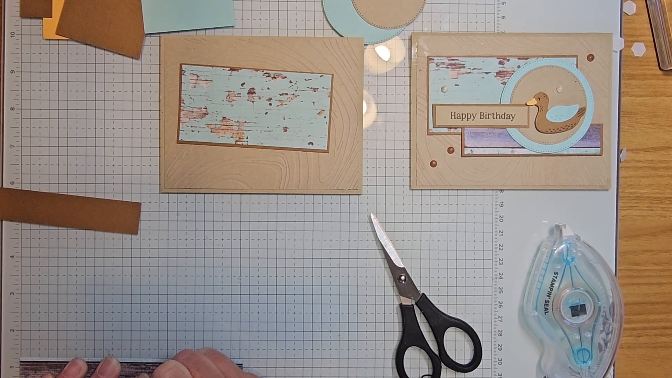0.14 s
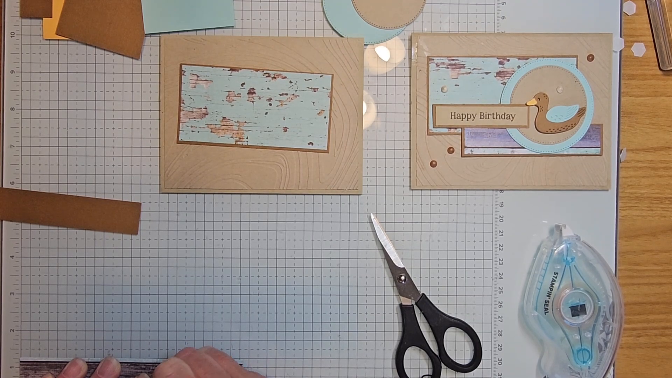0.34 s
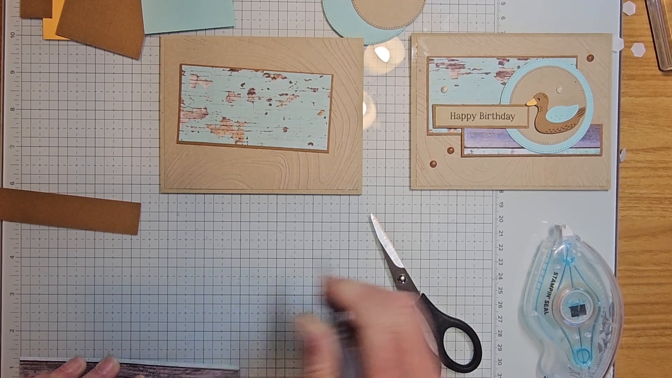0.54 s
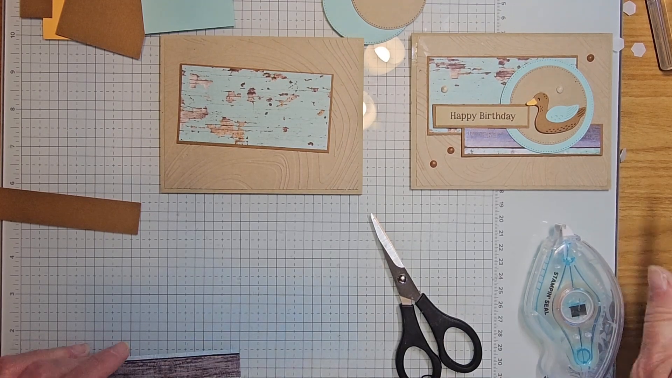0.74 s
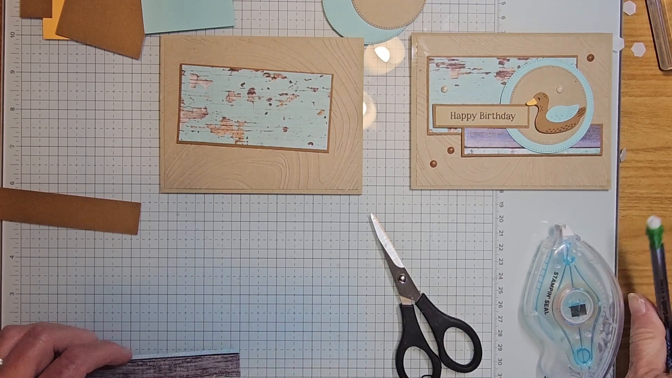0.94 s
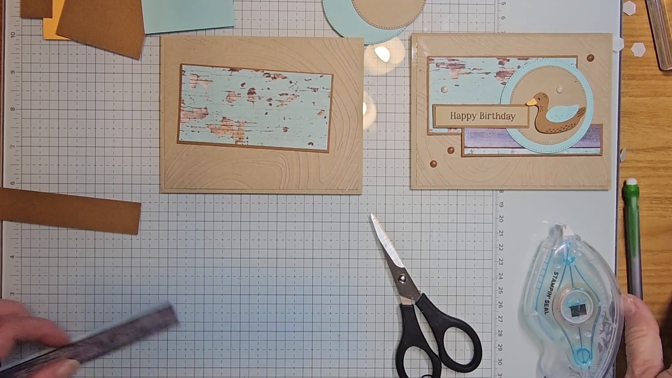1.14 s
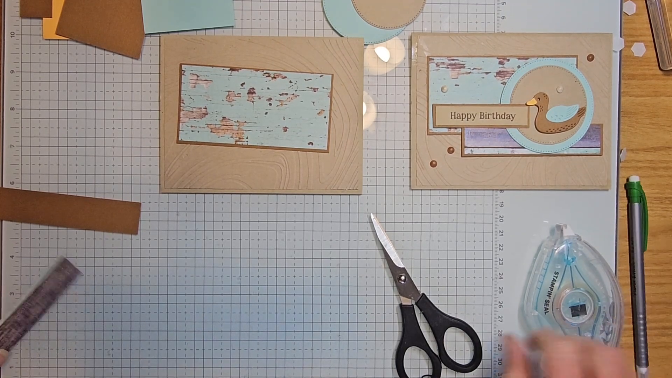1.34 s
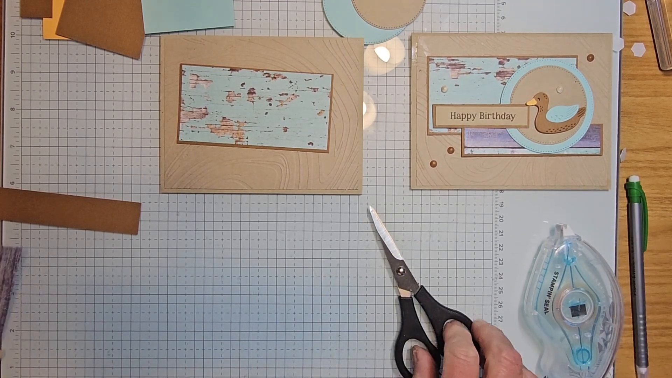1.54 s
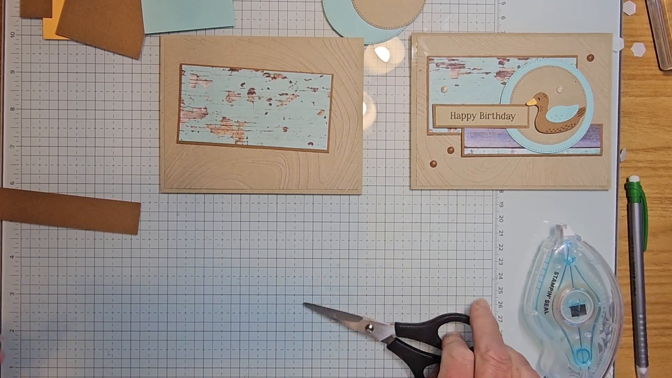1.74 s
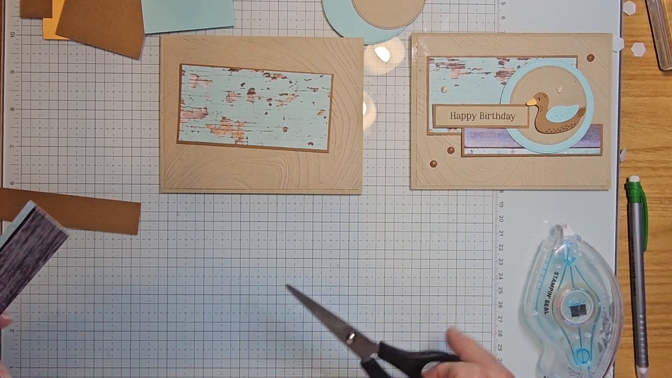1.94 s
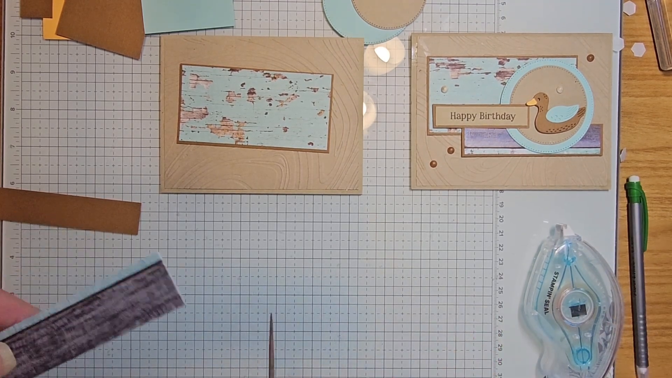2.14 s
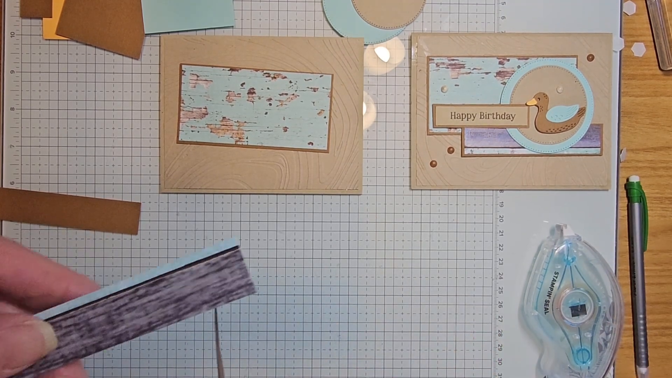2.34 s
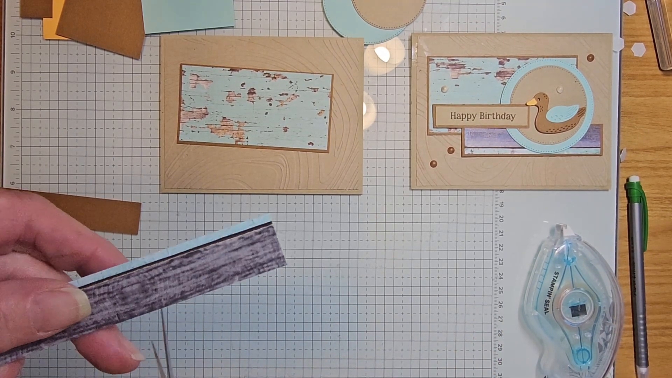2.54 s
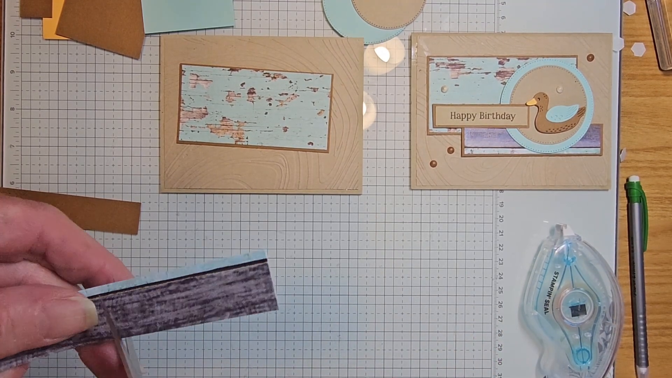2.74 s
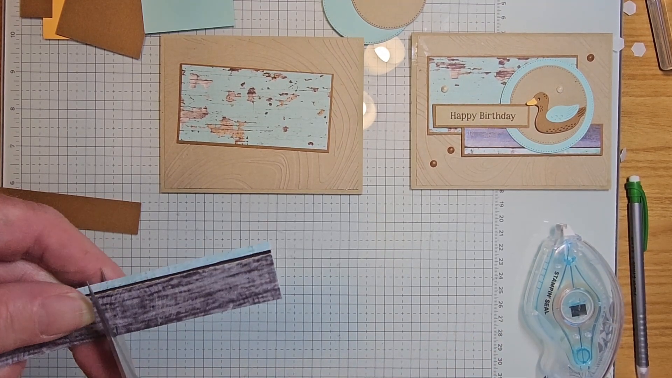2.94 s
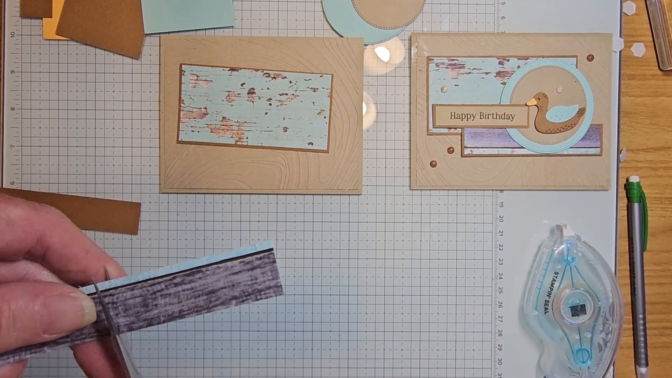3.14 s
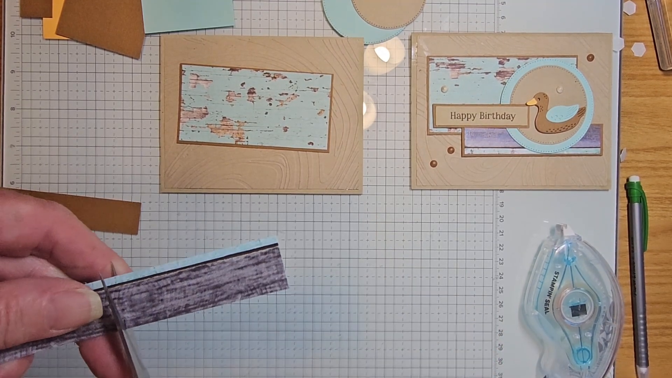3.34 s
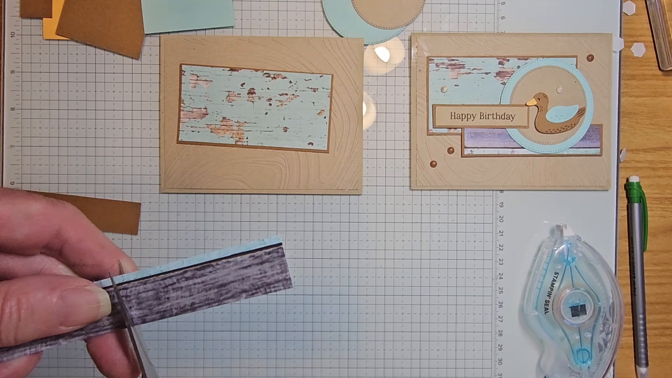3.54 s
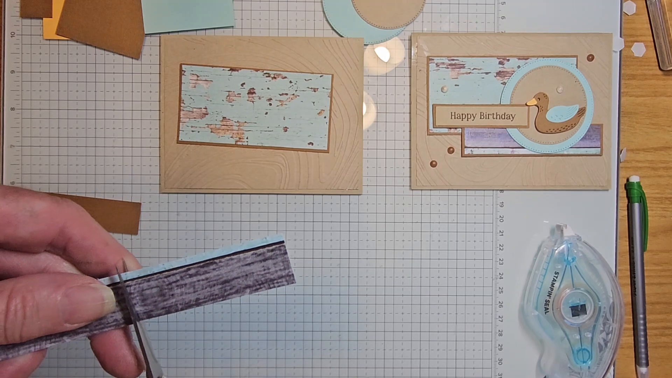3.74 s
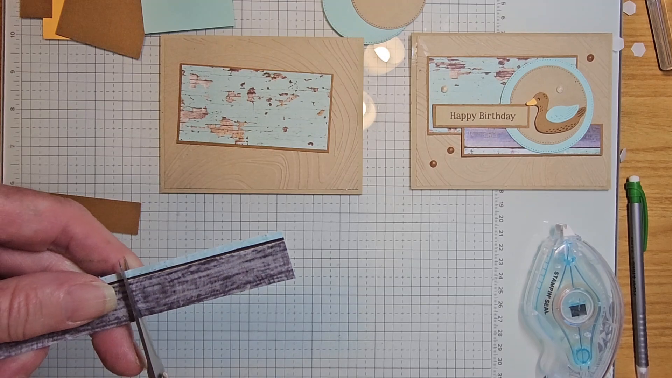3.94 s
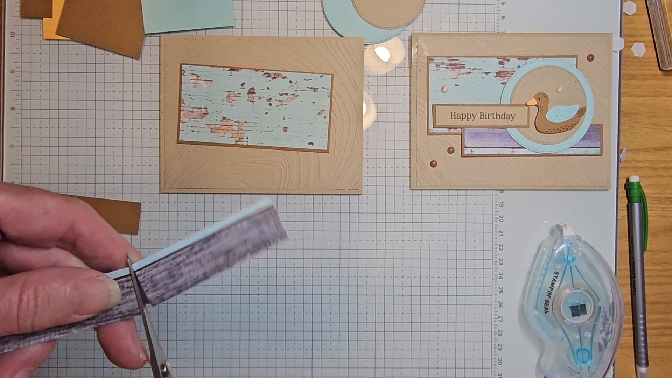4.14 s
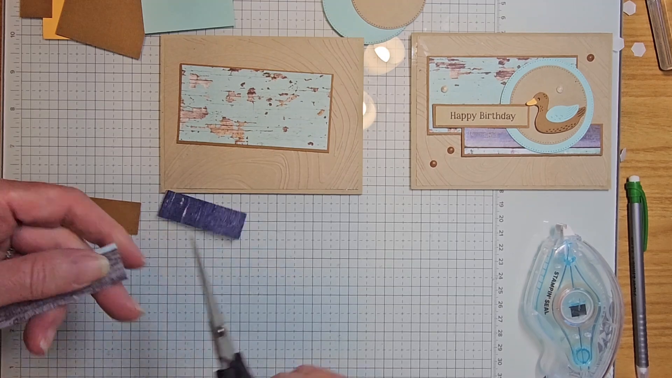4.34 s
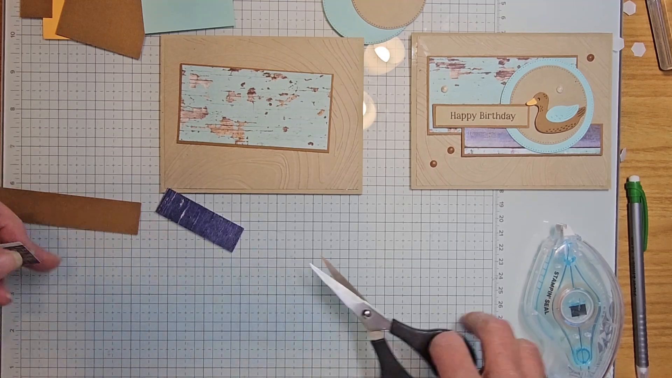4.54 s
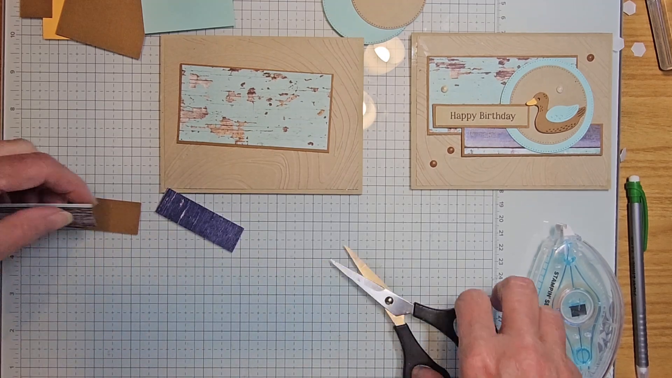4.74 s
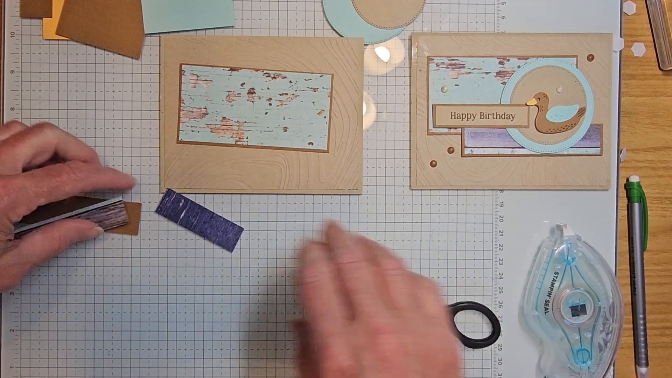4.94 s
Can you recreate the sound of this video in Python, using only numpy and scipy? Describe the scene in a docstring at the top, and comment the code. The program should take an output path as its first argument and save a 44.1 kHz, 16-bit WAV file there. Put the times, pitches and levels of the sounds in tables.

```python
"""A small, quiet room with a wooden table: card making, with a wall clock ticking faintly.
A paper strip is marked and the pencil put down: short cracks plus decaying modes.
Small scissors are dragged off the mat (stick-slip grains through steel and table modes),
crunch slowly through the strip (grains through held-blade resonances), snap shut and
clatter back onto the table, which rings under them."""
import sys
import numpy as np
from scipy import signal
from scipy.fft import rfft, irfft, next_fast_len
from scipy.io import wavfile
from scipy.ndimage import map_coordinates

SR = 44100
rng = np.random.default_rng(int(sys.argv[2]) if len(sys.argv) > 2 else 0)


def persist_wave(psi):
    """Save psi, clipped to +-1, as 16-bit WAV."""
    counts = np.round(np.clip(psi, -1, 1) * 32767).astype(np.int16)
    wavfile.write(sys.argv[1], SR, np.atleast_2d(counts).T)


N = 224149
TIME_S = np.arange(N) / SR
AGE_S = np.arange(SR // 2) / SR  # time since a blow


def amp(db):
    """Decibels to gain."""
    return 10 ** (np.asarray(db) / 20)


def unit(x):
    """Scale to rms 1."""
    return x / np.sqrt(np.mean(x ** 2) + 1e-20)


def fade(t60_s):
    """Exponential free decay after a blow."""
    return amp(-60 * AGE_S / max(t60_s, .002))


def along(points, hz):
    """Read (Hz, value) points on a log axis."""
    f, v = np.transpose(points)
    return np.interp(np.log(hz + 1), np.log(f + 1), v)


def wobble(knots_per_s):
    """Smooth random curve through random knots."""
    knots = rng.standard_normal(int(N * knots_per_s / SR) + 4)
    return map_coordinates(knots, [TIME_S * knots_per_s])


def add(track, s, sound):
    """Mix a sound into a track at time s."""
    part = track[:, round(s * SR):][:, :sound.shape[-1]]
    part += sound[..., :part.shape[-1]]


# left-right correlation: f/Hz, correlation
CORRELATION = [(100, .96), (350, .9), (650, .5), (1200, .08), (2500, -.06), (12000, .06)]


def colour(pair, spectrum_db):
    """Two unrelated signals become a stereo sound of rms 1, alike in the bass."""
    n = pair.shape[-1]
    m = next_fast_len(n + 8192)
    hz = np.fft.rfftfreq(m, 1 / SR)
    turn = np.arccos(np.clip(along(CORRELATION, hz), -1, 1)) / 2
    shaped = rfft(pair, m) * amp(spectrum_db(hz))
    mid, side = irfft(shaped * [np.cos(turn), np.sin(turn)], m)[:, :n]
    return unit(np.array([mid + side, mid - side]))


def noise(points, size=N):
    """Stereo noise with the given spectrum."""
    return colour(rng.standard_normal((2, size)), lambda hz: along(points, hz))


def grains(rate_per_s, spread_db, t60_s):
    """Random tiny slips of uneven size, each a very short noise puff."""
    sizes = amp(spread_db * np.minimum(rng.exponential(size=N), 3))
    slips = (rng.random(N) < rate_per_s / SR) * sizes
    return signal.fftconvolve(slips, fade(t60_s))[:N] * rng.standard_normal((2, N))


def ring(modes, weight_db=lambda hz: 0, scatter_db=5.0, blur_hz=8):
    """Decaying modes at random strengths, blurred by rattling; high ones differ in phase left to right."""
    out = np.zeros((2, len(AGE_S)))
    for hz, db, t60_s in modes:
        apart = np.arccos(np.clip(along(CORRELATION, hz), -1, 1)) * rng.choice([-1, 1]) / 2
        drift = np.cumsum(rng.standard_normal(len(AGE_S))) * np.sqrt(2 * np.pi * abs(blur_hz) / SR)
        phase = rng.uniform(0, 2 * np.pi) + drift + np.array([[apart], [-apart]])
        level = amp(db + weight_db(hz) + scatter_db * rng.standard_normal())
        out += level * fade(t60_s) * np.sin(2 * np.pi * hz * AGE_S + phase)
    return out


def resonate(x, response):
    """Pass a sound through a stereo response of energy 1."""
    kernel = unit(response) / np.sqrt(response.shape[-1])
    return signal.fftconvolve(x, kernel, axes=1)[:, :N]


def resonance_gain(peaks, hz):
    """Summed Lorentzian power of (Hz, width Hz, dB) resonances."""
    return sum(amp(db) ** 2 / (1 + ((hz - centre) / width) ** 2) for centre, width, db in peaks)


def body(modes, hz, lift_db, width_hz):
    """dB by which an object's damped resonances stand out of a broad sound."""
    peaks = [(centre, width_hz, db + lift_db) for centre, db, _ in modes]
    return 10 * np.log10(1 + resonance_gain(peaks, hz))


# broad spectrum of a contact crack: f/Hz, level/dB
CONTACT_SPECTRUM = [(30, -32.5), (250, -4), (700, 3.5), (1300, 5.5), (2000, 1), (4500, 0.5), (8000, 1.5),
                    (12000, 1), (15000, -3), (17000, -20.5)]


def contacts(rows, modes, t60_s, crack_db, ring_db, attack_s, lift_db, width_hz):
    """Each contact: a short crack in the object's resonances plus their free ring, tinted by how it lands."""
    track = np.zeros((2, N))
    grid = np.arange(0, SR // 2, 10)
    shape = along(CONTACT_SPECTRUM, grid) + body(modes, grid, lift_db, width_hz)
    for s, db, knock_db, treble_db in rows:
        tint = [(1400, knock_db), (2300, 0), (5000, 0), (11000, treble_db)]
        hardness = lambda hz: along(tint, hz)
        strength = np.sqrt(1 + amp(knock_db) ** 2 + amp(treble_db) ** 2)
        spectrum = lambda hz: np.interp(hz, grid, shape) + hardness(hz)
        crack = strength * colour(rng.standard_normal((2, len(AGE_S))), spectrum)
        blow = amp(crack_db) * crack * fade(t60_s) + amp(ring_db) * ring(modes, hardness)
        add(track, s, amp(db) * blow * (1 - fade(attack_s)))
    return track


def stroke(start, length, db, swell_db, edges_s):
    """Gain of one hand movement: sets in, swells or eases evenly about its level, lets go."""
    attack, release = np.maximum(edges_s, .005)  # s per 60 dB
    progress = np.clip((TIME_S - start) / length, 0, 1)
    before = np.maximum(start - TIME_S, 0) / attack
    after = np.maximum(TIME_S - start - length, 0) / release
    return amp(db + swell_db * (progress - .5) - 60 * np.minimum(before + after, 4))


def strokes(rows, edges_s):
    """Gain of several movements, the loudest ruling."""
    return np.max([stroke(*row, edges_s) for row in rows], axis=0)


# hush spectrum: f/Hz, level/dB
AIR_SPECTRUM = [(12, -35.5), (20, -11), (107, -3), (270, -17.5), (328, -8), (388, -22.5), (472, -16.5),
                (897, -24.5), (1120, -24.5), (1860, -25.5), (2750, -32), (4180, -32.5), (5530, -34.5),
                (6010, -42), (16000, -48)]
AIR_DB = -67


def air():
    """Steady room hush: shaped noise of slowly wavering level."""
    return amp(AIR_DB + .8 * wobble(1.4)) * noise(AIR_SPECTRUM)


# wall reverberation: f/Hz, t60/s
WALLS_T60 = [(100, .3), (1000, 0.12), (4000, 0.19), (9000, 0.2), (14000, 0.22)]


def room(x):
    """The walls answer after 5 ms; each band of the noise tail decays at its own rate, the bass longest."""
    hz, t, z = signal.stft(rng.standard_normal((2, SR // 2)), SR, nperseg=256)
    t60_s = np.maximum(along(WALLS_T60, hz), .02)[:, None]
    tail = signal.istft(z * amp(-60 * t / t60_s), SR, nperseg=256)[1]
    delayed = np.pad(colour(tail, np.zeros_like), ((0, 0), (SR // 200, 0)))
    return resonate(x, delayed)


CLOCK_FIRST_S, CLOCK_PERIOD_S, CLOCK_DB = .281, 1, -63


def clock(start_hz=760, rise_hz_per_s=7000, length_s=0.035):
    """Once a second the gears step: a short rising sine plus a noise rasp."""
    track = np.zeros((2, N))
    swell = np.sqrt(np.abs(np.sin(np.pi * np.minimum(AGE_S / length_s, 1))))
    whirr = np.sin(2 * np.pi * (start_hz + rise_hz_per_s * AGE_S / 2) * AGE_S)
    spectrum = [(300, -7.5), (1000, -2), (2000, -13.0), (3400, -9.5), (6000, -31.5), (15000, -35)]
    for s in np.arange(CLOCK_FIRST_S, N / SR, CLOCK_PERIOD_S):
        rasp = noise(spectrum, size=len(AGE_S))
        add(track, s - .003, amp(CLOCK_DB) * swell * (whirr + rasp))
    return track


# sleeve on the table's edge: t/s, length/s, level/dB, swell/dB, first f/Hz, last f/Hz
SLEEVE_DRAGS = [(.46, 0.24, -66, 0.5, 399, 208.6), (0.999, .19, -61.5, 1, 330, 749.4),
                (2.05, 0.64, -66, 0, 507.7, 433.2), (2.67, 0.32, -70, -1.5, 418.4, 307.7),
                (3.057, .35, -67.5, -3, 175.8, 170.2), (4.3, 0.2, -66.5, -11, 406, 475),
                (4.51, 0.092, -47, 4.5, 522, 498.5)]
SLEEVE_EDGES_S = (.18, 0.16)  # attack, release


def sleeve():
    """Cloth ribs pass over the table's edge: a fuzzy murmur whose pitch glides with the arm's speed."""
    glide = []
    for start, length, _, _, first, last in SLEEVE_DRAGS:
        glide += [(start, first), (start + length, last)]
    s, hz = np.transpose(glide)
    ribs = np.cumsum(np.interp(TIME_S, np.maximum.accumulate(s), hz)) / SR
    knots = rng.standard_normal((2, 2, N // 10))
    knots_per_rib = .75
    uneven = lambda k: map_coordinates(k, [ribs * knots_per_rib], mode="wrap")
    a, b = [np.array([uneven(k) for k in pair]) for pair in knots]
    murmur = colour(a * np.cos(2 * np.pi * ribs) + b * np.sin(2 * np.pi * ribs), np.zeros_like)
    gain = strokes([row[:4] for row in SLEEVE_DRAGS], SLEEVE_EDGES_S)
    return gain * amp(0.76 * wobble(20)) * murmur


# hands and tools bumping the table: t/s, thud level/dB, ring level/dB
TABLE_BUMPS = [(0.089, -31.5, -72), (0.327, -30, -68), (.672, -34.5, -73), (1.021, -46, -53),
               (1.055, -27, -49), (1.269, -46.5, -44.5), (1.573, -33, -31.5), (1.617, -20.5, -54),
               (1.734, -34, -50), (1.904, -40, -44.5), (4.612, -29, -34), (4.735, -21.5, -42.5),
               (4.784, -29, -37), (4.836, -25, -39), (4.922, -41.5, -37.5)]
# table top modes: f/Hz, level/dB, t60/s
TABLE_MODES = [(56, -3, .2), (134, -1, .2), (186, -6, .26), (255, -8, .2), (351, -4.5, .28), (695, -4, .18),
               (738, -7, .15), (1112, -3, .22), (1214, -5, .12), (1295, -4, .14), (1400, -3, .1),
               (1480, -5, .12)]
# dull thud spectrum: f/Hz, level/dB
THUD_SPECTRUM = [(20, -18), (55, 14.5), (180, 7), (400, -26), (900, -39), (3000, -69)]
THUD_T60_S, THUD_ATTACK_S = 0.14, 0.048


def table():
    """Bumps give a dull noise thud and set the table top's modes ringing."""
    track = np.zeros((2, N))
    for s, thud_db, ring_db in TABLE_BUMPS:
        thud = amp(thud_db - 16) * noise(THUD_SPECTRUM, size=len(AGE_S)) * fade(THUD_T60_S)
        ringing = amp(ring_db) * ring(TABLE_MODES, scatter_db=3.5, blur_hz=3.3)
        add(track, s - .003, (thud + ringing) * (1 - fade(THUD_ATTACK_S)))
    return track


# paper over the mat: t/s, length/s, level/dB, swell/dB, hiss over swish/dB
PAPER_BRUSHES = [(0.514, 0.15, -67.5, -4.5, -11), (0.915, 0.4, -63, 20, -5.5), (1.419, 0.23, -70, -13, -1),
                 (2.1, .19, -77, -8, 5.5), (4.292, 0.18, -66.5, 19, 0.5), (4.461, 0.16, -57, 13.5, 5.5)]
# face of the card on the mat: f/Hz, level/dB
SWISH_SPECTRUM = [(320, -33), (550, -4), (774, -7), (948, -15), (1430, -2), (1680, -16.5), (2500, -25.5),
                  (3250, -41.5), (5500, -120)]
# edge of the card on the mat: f/Hz, level/dB
HISS_SPECTRUM = [(1060, -39.5), (1800, -2.5), (3200, -11), (3990, -1), (6530, -14), (7220, -14),
                 (10000, -14.5), (11700, -12.5), (14600, -18.5), (16000, -42)]
BRUSH_EDGES_S = (.15, 0.37)  # attack, release


def brushing():
    """The card swishes softly on the mat (noise) while its edge hisses (grains)."""
    face = strokes([row[:4] for row in PAPER_BRUSHES], BRUSH_EDGES_S)
    swish = face * amp(2 * wobble(27)) * noise(SWISH_SPECTRUM)
    edge_rows = [(s, length, db + hiss_db, swell_db) for s, length, db, swell_db, hiss_db in PAPER_BRUSHES]
    slips = grains(rate_per_s=7100, spread_db=2.0, t60_s=0.0046)
    hiss = strokes(edge_rows, BRUSH_EDGES_S) * colour(slips, lambda hz: along(HISS_SPECTRUM, hz))
    return swish + amp(5.5) * hiss


# pencil landing and rocking: t/s, level/dB, knock/dB, treble/dB
PENCIL_HITS = [(1.2632, -16, -10, 0.5), (1.2685, -11.5, -4, -17.5), (1.287, -26, -2.5, -5),
               (1.3095, -24, 0, -1.5), (1.337, -25.5, -5.5, -23.5)]
# barrel modes: f/Hz, level/dB, t60/s
BARREL_MODES = [(1390, 0, .08), (3080, -7, .06), (4200, -6, .05), (7294, -4, .07), (13020, -3, .04)]
PENCIL_T60_S, PENCIL_RING_DB = 0.058, -21


def pencil():
    """The barrel lands on the wood and rocks: cracks in its modes, slightly right."""
    hits = contacts(PENCIL_HITS, BARREL_MODES, PENCIL_T60_S, crack_db=-6.0, ring_db=PENCIL_RING_DB,
                    attack_s=0.0076, lift_db=10, width_hz=89)
    return hits * amp([[-1.2], [1.2]])


# pencil's metal clip, one ping on landing: t/s, level/dB
CLIP_HIT = (1.2632, -5)
# clip modes: f/Hz, level/dB, t60/s
CLIP_MODES = [(12770, -7, .035), (13020, 0, .04), (13630, -16, .04)]


def ping():
    """The pencil's clip rings for an instant: a dry, very high ping, slightly right."""
    track = np.zeros((2, N))
    s, db = CLIP_HIT
    add(track, s, amp(db) * ring(CLIP_MODES, scatter_db=1, blur_hz=40) * (1 - fade(.004)))
    return track * amp([[-1.4], [1.4]])


# dry snaps of card and blades: t/s, level/dB, knock/dB, treble/dB
DRY_SNAPS = [(.4407, -60, 12, 0.5), (.6796, -50.5, -28, -4.5), (.7588, -34.5, -13, -3.5),
             (.7657, -36.5, -13, -54), (.9406, -58, -13, -4), (1.0164, -48.5, -2, -43),
             (1.0502, -27.5, -13, -4), (1.0622, -41.5, 4.5, -7), (1.1543, -50, 7.5, -27),
             (1.1738, -47, 8, -19), (2.4098, -50, -1, 5.5), (3.688, -56, -17, -2.5), (3.789, -58.5, -20, 0),
             (3.935, -59.5, -22, -2.5), (4.016, -55, -25.5, -2), (4.1275, -60, -24, 5),
             (4.158, -57.5, -25, 5), (4.2592, -34.5, 0.5, 0), (4.359, -50, -15, -1), (4.3765, -48, -19, 0),
             (4.4513, -19, -10.5, 0), (4.465, -34, -12, 4), (4.5581, -39, 7, 11.5),
             (5.0596, -32.5, -6.5, 1.5)]
# scissors modes: f/Hz, level/dB, t60/s
STEEL_MODES = [(1480, 0, .1), (1690, -3, .14), (2020, -3, .14), (2240, -6, .16), (2790, 0, .22),
               (3020, -4, .18), (3480, -3, .12), (3595, 0, .16), (3978, -2, .16), (4227, 0, .16),
               (4550, -1, .16), (4651, -2, .22), (4925, -5, .2), (5290, -6, .14), (6070, -4, .2),
               (6517, -4, .15), (6911, -3, .14), (7272, 3, .14), (7700, -7, .16), (8325, 1, .16),
               (10490, -3, .12), (11200, -1, .11), (11660, 0, .12), (13000, -3, .12), (14280, -5, .1)]
SNAP_T60_S, SNAP_RING_DB = 0.019, -39.5


def snaps():
    """Card and blades snap: very short cracks with a faint steel ring."""
    return contacts(DRY_SNAPS, STEEL_MODES, SNAP_T60_S, crack_db=1, ring_db=SNAP_RING_DB,
                    attack_s=0.005, lift_db=-7.5, width_hz=90)


# blades rubbing and biting through card: t/s, length/s, level/dB, swell/dB
CARD_CUTS = [(2.336, .055, -69.5, -6), (2.402, 0.01, -66, 3.5), (2.738, 0.11, -66.5, 3),
             (2.875, 0.06, -69.5, 16.5), (3.61, .015, -81, 2), (3.684, .2, -79.5, 6),
             (3.93, 0.052, -80.5, -10), (4.014, 0.084, -76, -6), (4.124, 0.13, -67, 14.5)]
# parting fibres: f/Hz, level/dB
SHEAR_SPECTRUM = [(590, -41), (1000, -6), (1730, 1), (2740, -10.5), (3050, -2), (3670, -3.5), (4170, -2.5),
                  (6550, -2), (7790, 4), (10400, -7.5), (14600, -6), (15500, -19), (16000, -43)]
# blades held in the hand, pressed on card: f/Hz, width/Hz, level before lift/dB
HELD_BLADE_PEAKS = [(1725, 35, -5), (3170, 27, 2), (4290, 200, -2), (7600, 36, 3), (7880, 120, -2.5),
                    (8980, 73, 0), (10600, 86, 1), (11600, 120, 4)]
HELD_LIFT_DB = 6
CUT_EDGES_S = (0.025, 0.027)  # attack, release


def cutting():
    """Paper fibres part one after another (grains) and sound through the blades."""
    lift = amp(HELD_LIFT_DB) ** 2
    peaks_db = lambda hz: 10 * np.log10(1 + lift * resonance_gain(HELD_BLADE_PEAKS, hz))
    blades = lambda hz: along(SHEAR_SPECTRUM, hz) + peaks_db(hz)
    fibres = colour(grains(rate_per_s=1900, spread_db=9.5, t60_s=0.022), blades)
    return amp(6.5) * strokes(CARD_CUTS, CUT_EDGES_S) * fibres


# scissors pushed over the mat: t/s, length/s, level/dB, swell/dB
MAT_SLIDES = [(1.6, 0.077, -44, 1), (1.765, 0.073, -48.5, 1.5), (1.87, 0.058, -45.5, 9.5),
              (1.955, 0.085, -37, 1.5), (4.712, 0.026, -33.5, 3), (4.76, 0.12, -39.5, 12.5),
              (4.88, 0.068, -41.5, -6.5)]
# scrape on the mat: f/Hz, level/dB
FRICTION_SPECTRUM = [(120, -31), (200, -20.5), (473, -44.5), (696, -5.5), (916, -31.5), (1100, -11),
                     (1400, -18.5), (2600, -7.5), (3800, -14.5), (4520, -12), (4770, -11.5), (7010, -19),
                     (16000, -29)]
SLIDE_EDGES_S = (0.099, 0.047)  # attack, release


def sliding():
    """The scissors catch and slip on the mat, exciting their own modes and the table's."""
    scrape = lambda hz: along(FRICTION_SPECTRUM, hz) + body(STEEL_MODES, hz, lift_db=8, width_hz=45)
    slips = grains(rate_per_s=2500, spread_db=4, t60_s=.004)
    rub = strokes(MAT_SLIDES, SLIDE_EDGES_S) * colour(slips, scrape)
    steel = resonate(rub, ring(STEEL_MODES))
    wood = resonate(rub, ring(TABLE_MODES, scatter_db=1))
    return amp(-0.5) * rub + amp(-17) * steel + amp(-19.0) * wood


# scissors hitting the mat: t/s, level/dB, knock/dB, treble/dB
SCISSORS_HITS = [(1.557, -21.5, 5.5, -2.5), (1.572, -16.5, 2, -12.5), (1.6153, -41, 11.5, -22),
                 (1.6764, -34, -17, -15), (1.727, -44.5, 10, -24), (1.777, -37.5, -5, -33),
                 (1.8503, -31.5, 4.5, -1), (1.9016, -39.5, 0.5, -5), (1.949, -29.5, -11, -8),
                 (4.6108, -4, -9.5, -3), (4.6324, -13.5, -2.5, 1), (4.648, -14, -8, -6),
                 (4.6614, -19, -5.5, -2), (4.698, -19, -12, -5.5), (4.7584, -12, -3, -4),
                 (4.787, -17.5, -3.5, 1.5), (4.833, -21.5, 0, 0), (4.912, -36.5, 11, -6),
                 (4.9242, -27.5, 4.5, -30), (4.9364, -32.5, 6.5, -43)]
SCISSORS_T60_S, SCISSORS_RING_DB = .056, -28.5  # every crack dies alike and leaves the steel ringing


def scissors():
    """Scissors clatter (cracks plus steel modes) and scrape on the mat, slightly right."""
    clatter = contacts(SCISSORS_HITS, STEEL_MODES, SCISSORS_T60_S, crack_db=-5, ring_db=SCISSORS_RING_DB,
                       attack_s=0.0045, lift_db=10, width_hz=45)
    return (clatter + sliding()) * amp([[-.5], [.5]])


def scene():
    """Tools, paper and table in the room, over its steady hush; ping and table stay dry."""
    paper = brushing() + snaps() + cutting()
    near = clock() + sleeve() + paper + pencil() + scissors()
    return air() + amp(-6.5) * room(near) + table() + ping() + near


CEILING, TOP_HZ = .8, 15400


def record(dry):
    """Round off the loudest peaks below CEILING, then low-pass steeply at TOP_HZ."""
    rounded = dry / (1 + (dry / CEILING) ** 8) ** (1 / 8)
    m = next_fast_len(N + SR // 2)
    hz = np.fft.rfftfreq(m, 1 / SR)
    return irfft(rfft(rounded, m) / np.sqrt(1 + (hz / TOP_HZ) ** 140), m)[:, :N]


dry = scene()
out = record(dry)
persist_wave(out)
```